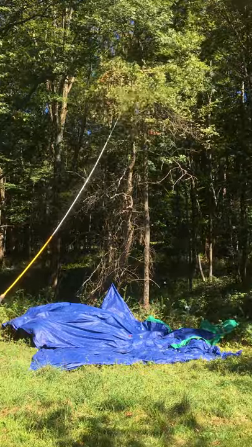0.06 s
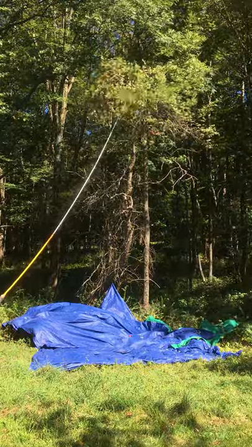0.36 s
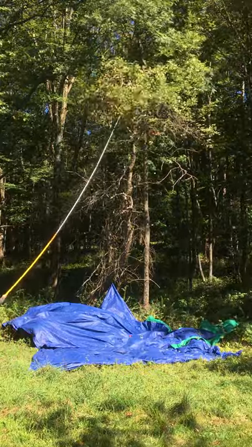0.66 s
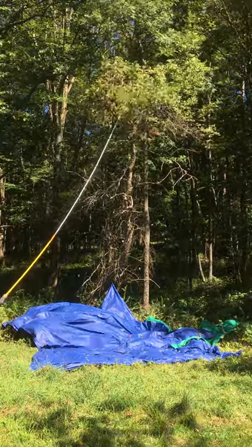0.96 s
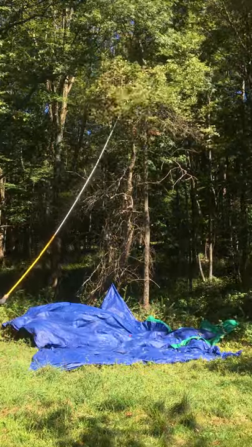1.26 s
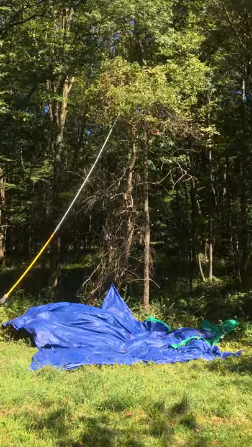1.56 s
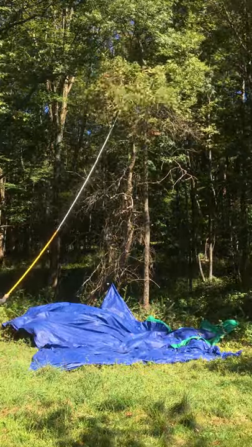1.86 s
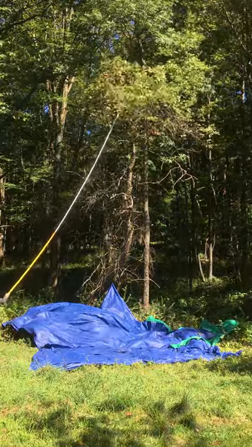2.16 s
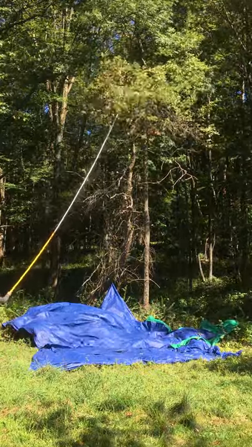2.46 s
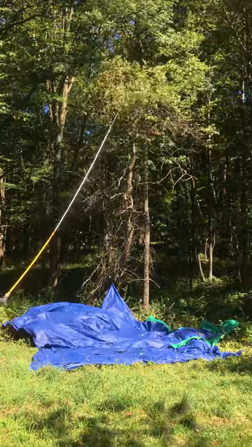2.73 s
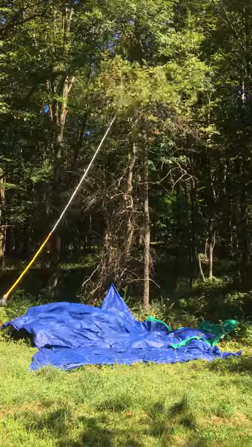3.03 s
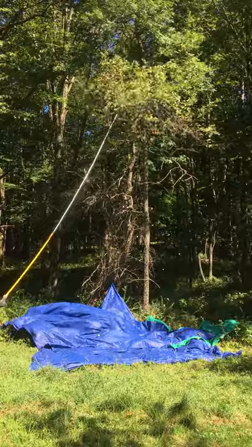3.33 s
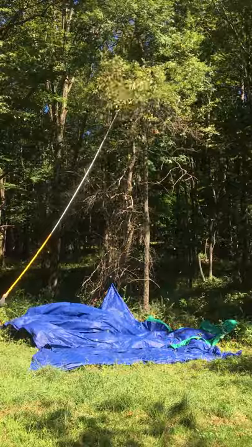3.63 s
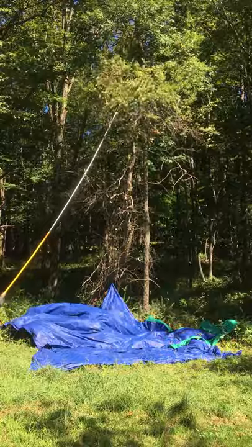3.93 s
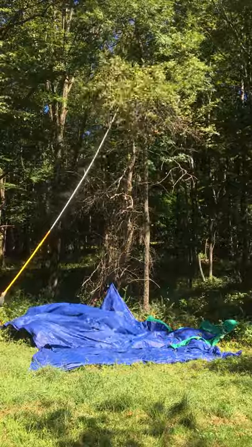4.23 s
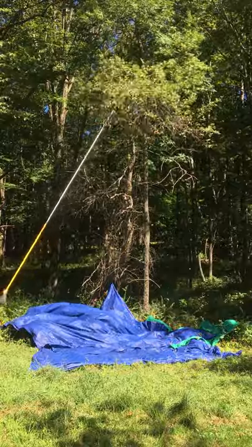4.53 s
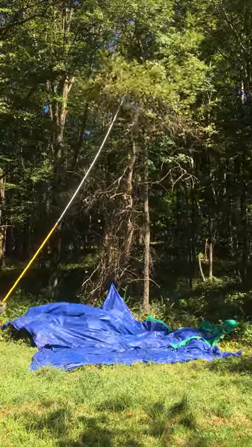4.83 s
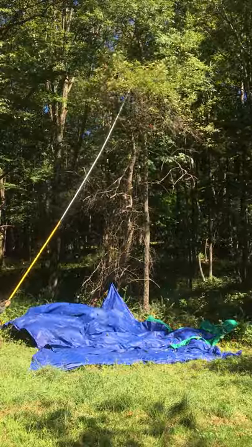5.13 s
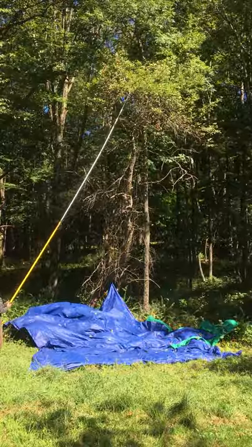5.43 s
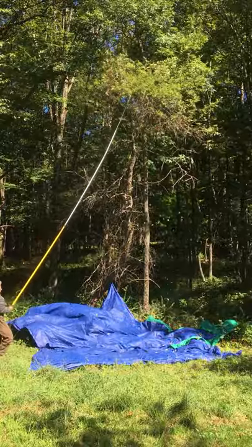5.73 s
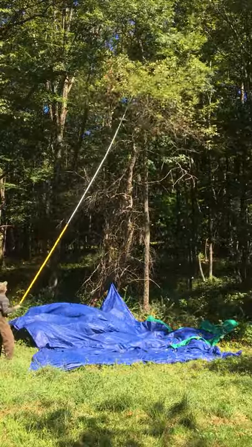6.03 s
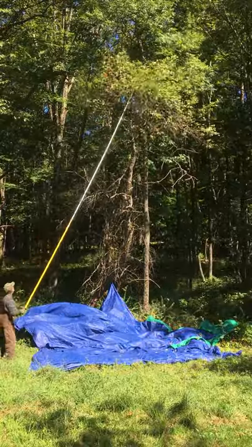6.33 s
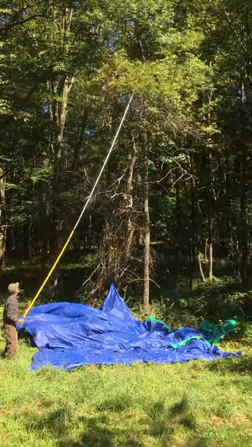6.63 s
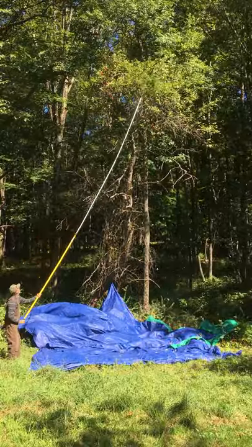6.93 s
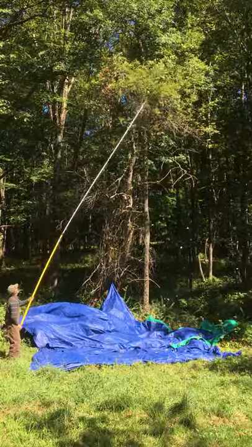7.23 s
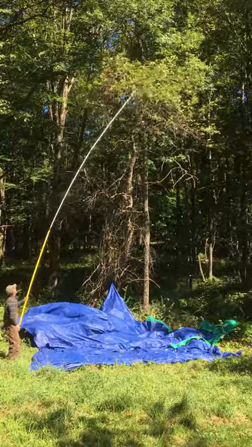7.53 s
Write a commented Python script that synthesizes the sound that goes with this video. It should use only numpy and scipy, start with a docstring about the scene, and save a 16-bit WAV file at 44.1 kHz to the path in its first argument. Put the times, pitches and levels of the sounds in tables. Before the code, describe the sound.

Leaves rustle as a long pole shakes an apple tree some metres away. From about 0.2 seconds apples drop in irregular clusters, each making a crisp, crinkly slap on a plastic tarp and a short, dull thud in the turf beneath. The heaviest thud comes at about 1 second. Hollow knocks on branches stand out around 1.7, 2.7, 3.1, 3.7 and 4.9 seconds, and bright cracks of twigs or stiff plastic near 2.7, 3, 4.5 and 5.3 seconds. The rustle is strongest from 2 to 4.3 seconds, then fades. Apples keep landing until about 6 seconds, with one last faint drop at 6.4. From 6.3 to 7.3 seconds the pole scrapes and taps quietly between branches, and small twig ticks continue to the end, near 7.7 seconds. The woods return a light echo of each hit, over faint outdoor air and a thin insect hiss.

```python
"""Shaking down apples

A long pole shakes an apple tree at the edge of a wood, some metres away. For about six seconds apples
knock on branches, slap a crumpled plastic tarp and thud into the turf under it; then the pole scrapes
between the branches. Leaves rustle and twigs tick all along over a faint hiss of insects,
and the trees scatter each hit back."""
import sys
import numpy as np
from scipy import signal
from scipy.io import wavfile
from scipy.ndimage import uniform_filter1d

SR = 44100
rng = np.random.default_rng(int(sys.argv[2]) if len(sys.argv) > 2 else 0)


def to_wav(s):
    """Save 16-bit WAV."""
    ch = np.atleast_2d(s).T  # columns
    pcm = np.round(np.clip(ch, -1, 1) * 32767)  # PCM
    wavfile.write(sys.argv[1], SR, pcm.astype(np.int16))


N = 339129
BINS = np.fft.rfftfreq(2048, 1 / SR)  # frequency grid of the EQ curves [Hz]

# Tarp slaps and turf thuds of falling apples; the faint row at 0.592 s is a short low echo of the
# landing before it: (time [s], slap level [dB], sinking time from slap to thud [s],
# sheet's 1/e settling time [s], thud level [dB], thud pitch [Hz])
APPLES = [(.215, -31, .007, 0.0055, -27.5, 252), (0.253, -34.5, 0.02, 0.0057, -25, 135),
          (.264, -38.5, 0.022, 0.012, -26, 106), (0.36, -38.5, 0.0065, 0.015, -42, 251),
          (0.548, -45, 0.0041, 0.021, -25, 285), (.592, -56, 0.0043, .02, -34, 310),
          (.867, -30, 0.0075, 0.008, -22, 284), (.983, -31.5, 0.0036, 0.0068, -12.5, 295),
          (1.25, -40, 0.015, .06, -48, 250), (1.276, -34, 0.013, .012, -25.5, 246),
          (1.307, -41, 0.0028, 0.015, -23, 255), (1.381, -38, 0.0072, 0.02, -32.5, 360),
          (1.422, -44.5, 0.0045, 0.037, -31.5, 328), (1.634, -35, 0.007, 0.01, -23.5, 174),
          (1.671, -36.5, 0.0051, 0.037, -26, 276), (2.006, -37, 0.016, 0.012, -29, 345),
          (2.101, -34.5, 0.006, 0.0064, -30, 228), (2.148, -37, 0.0028, 0.025, -23.5, 318),
          (2.242, -34, 0.012, 0.026, -20.5, 182), (2.392, -46, .005, 0.02, -25.5, 188),
          (2.412, -34, 0.0061, 0.027, -24.5, 204), (2.436, -34.5, 0.0072, .012, -23, 180),
          (2.545, -32.5, .008, 0.023, -28.5, 192), (2.674, -35, 0.0044, 0.03, -32.5, 175),
          (2.762, -33, .01, 0.011, -24.5, 240), (2.81, -39, 0.0095, 0.043, -38, 300),
          (3.007, -32.5, 0.0076, 0.037, -25.5, 236), (3.021, -34, 0.0095, 0.0061, -27, 160),
          (3.123, -33.5, 0.0088, 0.019, -25.5, 320), (3.156, -30, .004, 0.018, -31, 168),
          (3.173, -42, 0.0053, 0.021, -24.5, 136), (3.286, -38.5, 0.005, 0.0042, -56, 250),
          (3.306, -43.5, 0.011, 0.012, -39, 200), (3.32, -29.5, 0.0081, .005, -25, 151),
          (3.68, -35, .012, 0.017, -31, 258), (3.757, -39.5, 0.0073, 0.018, -28.5, 237),
          (3.893, -36.5, 0.0046, 0.023, -23.5, 306), (3.917, -32.5, 0.0065, 0.0058, -25, 149),
          (4.051, -42.5, 0.0039, 0.047, -40, 145), (4.125, -44.5, 0.0028, 0.037, -37.5, 176),
          (4.25, -29.5, 0.0075, 0.023, -33, 130), (4.271, -34, .011, 0.0036, -26.5, 98),
          (4.304, -37.5, 0.0062, 0.018, -37, 167), (4.357, -39.5, 0.0084, 0.023, -29, 250),
          (4.394, -36.5, 0.0099, 0.013, -25.5, 246), (4.455, -39.5, 0.0067, .03, -32, 220),
          (4.477, -34.5, .003, .005, -16.5, 178), (4.488, -30.5, 0.0032, .014, -29, 147),
          (4.538, -37.5, 0.0072, 0.0095, -32, 230), (4.682, -41.5, 0.0042, 0.033, -22.5, 230),
          (4.907, -36, 0.0065, 0.068, -32, 161), (4.953, -44, 0.0086, 0.027, -24, 244),
          (4.966, -34.5, 0.011, 0.027, -19, 214), (4.989, -33.5, 0.0031, .016, -42, 185),
          (5.101, -31, 0.019, 0.017, -48, 175), (5.22, -33.5, 0.0075, 0.028, -30, 226),
          (5.278, -33.5, 0.0033, 0.033, -26.5, 155), (5.376, -34, 0.018, 0.01, -25, 155),
          (5.457, -38, 0.0038, 0.015, -24, 173), (5.63, -40.5, 0.01, 0.019, -30, 116),
          (5.644, -35, 0.02, 0.019, -41, 170), (5.761, -30, 0.00536, 0.015, -24.5, 165),
          (5.857, -41.5, 0.0096, 0.025, -32, 228), (5.918, -40, 0.0039, 0.033, -31.5, 138),
          (6.093, -40, 0.0032, 0.042, -36, 198), (6.401, -54, .008, 0.0077, -42.5, 109)]


def amp(db):
    """Decibels to gain."""
    return 10 ** (np.asarray(db) / 20)


def unit_rms(x):
    """Scales to rms 1."""
    return x / np.sqrt(np.mean(x ** 2) + 1e-20)


def read_curve(points, hz):
    """Reads a table along a log-frequency axis."""
    f, value = np.transpose(points)
    return np.interp(np.log(hz + 1), np.log(f + 1), value)


def add(mix, s, sound):
    """Mixes a sound in at s seconds."""
    part = mix[max(round(s * SR), 0):][:len(sound)]
    part += sound[:len(part)]


def colour(x, curve_db):
    """Minimum-phase EQ with the given gain at each of BINS."""
    log_gain = np.log(amp(np.r_[curve_db, curve_db[-2:0:-1]]))
    taps = np.fft.ifft(np.exp(np.conj(signal.hilbert(log_gain)))).real
    return signal.oaconvolve(x, taps)[:len(x)]


def spectrum(points):
    """A spectrum table as an EQ curve that keeps the power of white noise."""
    curve_db = read_curve(points, BINS)
    return curve_db - 10 * np.log10(np.mean(amp(curve_db) ** 2))


def resonance(hz, width_hz):
    """EQ curve of a single peak, 6 dB down at width_hz to either side."""
    return -20 * np.log10(1 + ((BINS - hz) / width_hz) ** 2)


def high_pass(x, hz, order):
    """Rolls off the lows below hz."""
    return signal.sosfilt(signal.butter(order, hz, "highpass", fs=SR, output="sos"), x)


def wander(size, span):
    """Smooth random drift of rms 1 that changes over about span samples."""
    return unit_rms(uniform_filter1d(uniform_filter1d(rng.standard_normal(size), span), span))


def crackle(size, per_s, spread_db):
    """Dense tiny clicks at rms 1; spread_db makes their sizes uneven."""
    strength = amp(spread_db * np.minimum(rng.exponential(1, size), 4))
    polarity = rng.choice([-1., 1.], size)
    fires = rng.random(size) < per_s / SR
    return unit_rms(strength * polarity * fires)


def chance_events(span, count, spread_db):
    """One random event in each equal slot of a span of seconds: rows of (time [s], level [dB])."""
    jitter, weakness = rng.random((count, 2)).T
    times = span[0] + (np.arange(count) + jitter) / count * (span[1] - span[0])
    return np.c_[times, -spread_db * weakness]


def air(level_db=-60):
    """A faint, steady bed of outdoor air, mostly low rumble."""
    # Tone of the open air: (frequency [Hz], relative level [dB])
    air_tone = [(20, -11), (40, 6), (62, 7), (100, 0), (170, -1), (400, -8), (1000, -12.5), (2200, -19),
                (5000, -19), (7000, -41), (10000, -44), (16000, -49)]
    return amp(level_db) * colour(rng.standard_normal(N), spectrum(air_tone))


def insects(level_db=-75, hz=8400, width_hz=450):
    """A far chorus in the grass merges into one narrow hiss."""
    chorus = colour(rng.standard_normal(N), resonance(hz, width_hz))
    return amp(level_db) * unit_rms(chorus)


def shake_db(s):
    """How hard the crown is shaken at s seconds; drives both leaves and twigs."""
    # Envelope of the shaking: (time [s], level [dB])
    shaking = [(0, -56), (.7, -52), (1.15, -54), (1.4, -51.5), (2.3, -49.5), (2.95, -51.5), (3.15, -48),
               (3.65, -49.5), (4.2, -48.5), (4.9, -58.5), (5.6, -63), (5.95, -61), (6.3, -59.5),
               (6.65, -61), (6.88, -57), (7.02, -61), (7.45, -64), (7.69, -59.5)]
    return np.interp(s, *np.transpose(shaking))


def leaves(level_db=-0.5, flutter_db=1.5):
    """Countless leaves brush each other in uneven flurries."""
    # Tone of the rustle: (frequency [Hz], relative level [dB])
    leaf_tone = [(60, -33), (300, 1.5), (900, -0.5), (2200, 2), (4000, 4), (6000, 1.5), (9000, -3),
                 (12000, -6.5), (16000, -17.5)]
    flurries = wander(N, 1200)
    envelope = amp(shake_db(np.arange(N) / SR) + level_db + flutter_db * flurries)
    brushing = envelope * crackle(N, per_s=7000, spread_db=-0.5)
    return colour(brushing, spectrum(leaf_tone))


def snaps(level_db=4, decay_s=0.0019, twig_boost_db=11):
    """A twig or a stiff crease gives way with a bright crack; small twigs keep ticking in the crown."""
    # Sharp cracks of twigs and taut plastic: (time [s], level [dB])
    cracks = [(1.672, -35), (1.988, -30), (2.615, -32), (2.676, -23.5), (3.025, -23), (4.489, -29),
              (4.54, -27), (5.227, -29), (5.279, -26), (6.377, -49), (6.927, -45), (7.605, -48)]
    # Tone of a crack: (frequency [Hz], relative level [dB])
    crack_tone = [(300, -67), (1500, -31), (3500, 1), (8000, -4.5), (16000, -12.5)]
    out, t = np.zeros(N), np.arange(SR // 20) / SR
    twigs = [(s, shake_db(s) + twig_boost_db + db)
             for s, db in chance_events((0, N / SR), count=20, spread_db=9)]
    for s, db in cracks + twigs:
        burst = rng.standard_normal(len(t)) * np.exp(-t / decay_s)
        tick = colour(burst, spectrum(crack_tone))
        add(out, s, amp(db + level_db) * tick / abs(tick).max())
    return out


def knocks(firm_db=-24, firm_decay_s=0.0035, glance_db=13.5, rise_share=0.46,
           probing_s=(6.3, 7.3), scrape_db=-50, scrape_hz=1350, scrape_octaves=0.55):
    """A rattling touch on a branch rings one heavily damped, hollow mode; weak touches are scrapes."""
    # Fruit or pole striking a branch: (time [s], peak level [dB], pitch [Hz])
    branch_hits = [(.365, -48, 1530), (0.983, -27.5, 1920), (1.26, -31, 1790), (1.517, -36.5, 1360),
                   (1.689, -20, 1970), (2.674, -18.5, 1350), (2.988, -33.5, 1450), (3.128, -22, 1450),
                   (3.636, -36.5, 1850), (3.695, -19, 1750), (4.908, -23, 1097), (6.093, -32, 1660),
                   (6.333, -47, 1570), (6.714, -45, 1305), (6.795, -44, 1470), (6.961, -56, 1530),
                   (7.191, -48.5, 1830)]
    out, t = np.zeros(N), np.arange(SR // 5) / SR
    # the pole feels its way between bare branches
    scrapes = [(s, scrape_db + db, scrape_hz * 2 ** (scrape_octaves * rng.standard_normal()))
               for s, db in chance_events(probing_s, count=12, spread_db=4)]
    for s, db, hz in branch_hits + scrapes:
        decay_s = firm_decay_s * 2 ** ((firm_db - db) / glance_db)  # glancing touches last longer
        force = (1 - np.exp(-t / (rise_share * decay_s))) * np.exp(-t / decay_s)
        rattle = force * crackle(len(t), per_s=7000, spread_db=0)
        ring = colour(rattle, resonance(hz, width_hz=650))
        add(out, s, amp(db) * ring / abs(ring).max())
    return out


def thuds(glide_cycles=0.98, rise_cycles=0.75, fall_cycles=0.51, bump_db=-17, bump_s=0.0021,
          tuft_depth=0.14, hop_s=(0.018, 0.063), hop_db=-40, hop_pitch_ratio=1.4):
    """Each landing is a short, dull thud of about two swings, falling in pitch; a light hop follows."""
    out, lead_s = np.zeros(N), 0.02
    t = np.arange(-lead_s, 2 * lead_s, 1 / SR)  # the swell peaks at t = 0
    age = np.maximum(t, 0) / bump_s
    bass_bump = amp(bump_db) * age * (2 - age) * np.exp(1 - age)
    landings = [(s + sink_s, db, hz) for s, _, sink_s, _, db, hz in APPLES]
    hops = [(s + rng.uniform(*hop_s), db + hop_db, hz * hop_pitch_ratio) for s, db, hz in landings]
    for s, db, hz in landings + hops:
        cycles = glide_cycles * np.log(np.maximum(1 + t * hz / glide_cycles, 1e-3))  # falling pitch
        swell = np.exp(-(cycles / np.where(t < 0, rise_cycles, fall_cycles)) ** 2)
        tufts = wander(len(t), 50)  # tufts of grass make every landing different
        swing = np.sin(2 * np.pi * cycles) + tuft_depth * tufts
        add(out, s - lead_s, amp(db) * (swell * swing + bass_bump))
    return out


def tarp(level_db=3, first_touch=0.54, give_share=0.78, clump_db=2, fold_db=1.5,
         usual_sink_s=0.0079, usual_settle_s=0.017, tick_db=-5, tick_decay_s=0.00056):
    """A crisp tick on contact; creases buckle in clumps as an apple pushes the sheet down, then settle."""
    # Tone of the crumpled plastic: (frequency [Hz], relative level [dB])
    plastic_tone = [(30, -73), (70, 9), (150, 3.5), (350, 1), (550, -2.5), (800, -0.5), (1300, 2.5),
                    (2300, 2), (3600, 0), (6000, -3), (8000, -9.5), (10000, -9), (13000, -19.5),
                    (16000, -28)]
    out, t = np.zeros(N), np.arange(SR // 4) / SR
    octaves = np.log2(np.clip(BINS, 700, 11000) / 1400)  # the tilt pivots at 1400 Hz
    for s, db, sink_s, settle_s, _, _ in APPLES:
        give_s = give_share * sink_s  # the sheet buckles hardest here
        push = np.interp(t, [0, give_s], [first_touch, 1])
        settling = np.exp(-np.maximum(t - give_s, 0) / settle_s)
        clumps = amp(clump_db * wander(len(t), 50))
        folds_db = fold_db * wander(len(BINS), 16)  # every spot is folded into its own colour
        creases = push * settling * clumps * crackle(len(t), per_s=16000, spread_db=3)
        slack = np.log2(sink_s / usual_sink_s)  # slack plastic sinks longer and is brighter
        taut = np.log2(usual_settle_s / settle_s)  # taut spots settle fast and are crisper
        tilt_db_per_octave = -0.5 + 0.5 * slack + 0.45 * taut
        crunch = colour(creases, spectrum(plastic_tone) + tilt_db_per_octave * octaves + folds_db)
        burst = rng.standard_normal(len(t)) * np.exp(-t / tick_decay_s)
        tick = high_pass(burst, hz=5000, order=2)
        add(out, s, amp(db + level_db) * (crunch + amp(tick_db) * tick))
    return out


def scatter(x, t60, build_s, places):
    """Weak reflections build up, then die away by frequency; each place has its own set of paths."""
    out, t = np.zeros(N), np.arange(SR) / SR
    place = np.arange(N) // (SR // 10) % places  # the places take turns every 0.1 s
    for k in range(places):
        reflections = crackle(SR, per_s=5000, spread_db=1) * (1 - np.exp(-t / build_s))
        hz, when, bands = signal.stft(reflections, SR, nperseg=256)
        fade = amp(-60 * when / read_curve(t60, hz)[:, None])
        tail = signal.istft(bands * fade, SR, nperseg=256)[1]
        send = np.sqrt(abs(uniform_filter1d(1. * (place == k), size=800)))  # equal-power crossfade
        out += signal.oaconvolve(x * send, tail / np.linalg.norm(tail))[:N]
    return out


def scene():
    """The mono mix: tree and ground scatter the hits at once, the wood behind them later."""
    # Decay of the wood's echo and of the near reflections: (frequency [Hz], time to fall 60 dB [s])
    wood_t60 = [(60, 2), (300, 1.95), (1500, 0.96), (4000, 0.94), (8000, 0.51), (16000, 0.94)]
    near_t60 = [(100, 0.28), (1500, 0.27), (12000, 0.093)]
    sharp = tarp() + knocks() + snaps()
    dull = thuds()
    thud_tops = high_pass(dull, hz=780, order=1)  # long waves bend round the trunks and hardly return
    near = scatter(amp(-14.5) * sharp + amp(-4) * thud_tops, near_t60, build_s=0.002, places=9)
    far = scatter(amp(-10.5) * sharp + amp(-14) * thud_tops, wood_t60, build_s=0.0064, places=7)
    return (sharp + dull + near + far + leaves() + insects() + air())[None]


def record(dry):
    """The microphone adds narrow peaks and dips, rolls off the bass and cuts the extreme top."""
    # Peaks and dips of the microphone: (frequency [Hz], width [Hz], gain [dB])
    mic_bands = [(1450, 48, 5.5), (1780, 310, -4.5), (1950, 274, 5), (2380, 150, 3.5), (2965, 320, -10.5),
                 (3068, 350, 8.5), (3645, 440, -3.5), (4940, 155, -6.5), (10430, 580, -6.5)]
    ripple_db = sum(db / (1 + (2 * (BINS - hz) / width) ** 2) for hz, width, db in mic_bands)
    coloured = high_pass(colour(dry[0], ripple_db), hz=44.2, order=4)
    top_cut = signal.firwin(511, cutoff=16100, window=("kaiser", 9), fs=SR)
    return signal.oaconvolve(coloured, top_cut, "same")[None]


dry = scene()
out = record(dry)
to_wav(out)
```